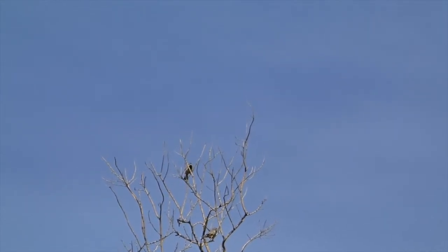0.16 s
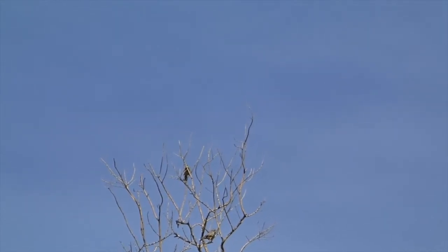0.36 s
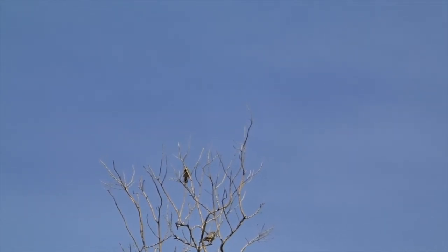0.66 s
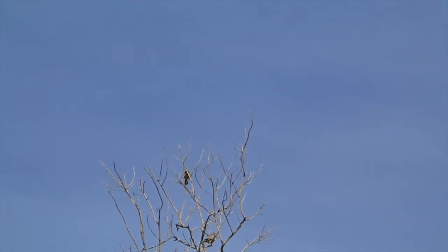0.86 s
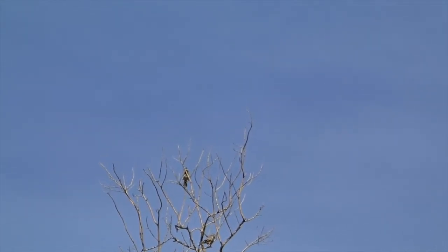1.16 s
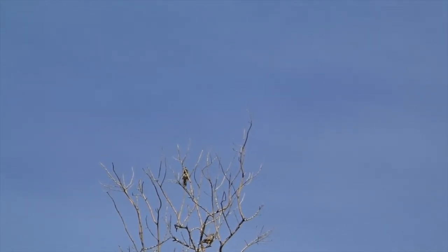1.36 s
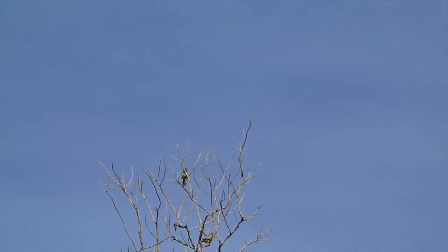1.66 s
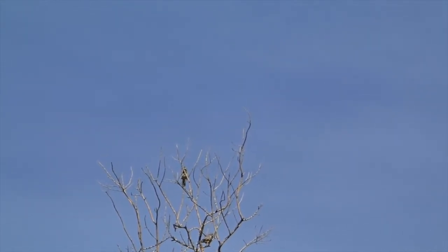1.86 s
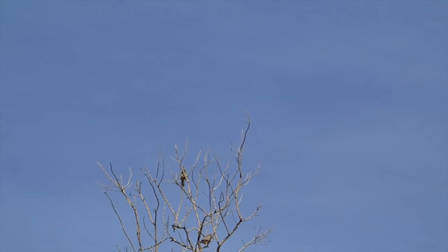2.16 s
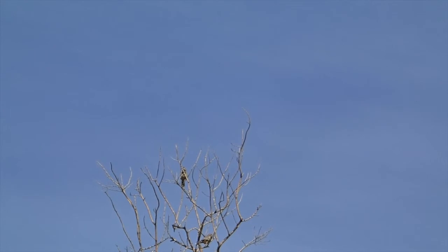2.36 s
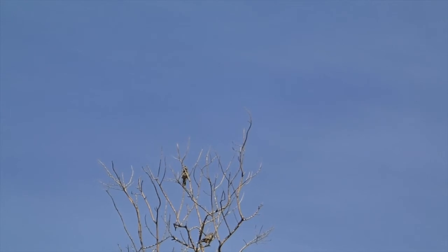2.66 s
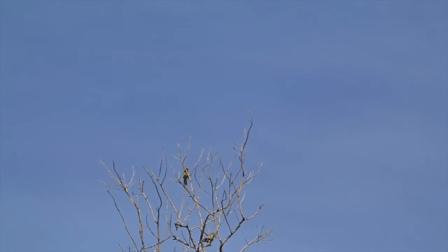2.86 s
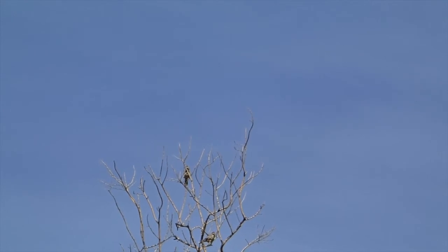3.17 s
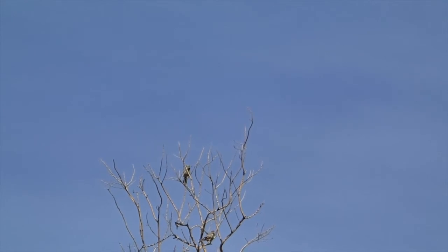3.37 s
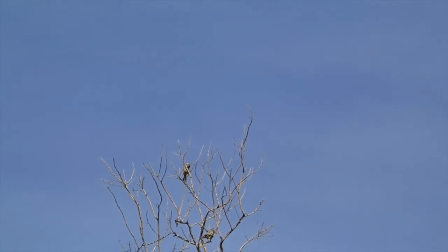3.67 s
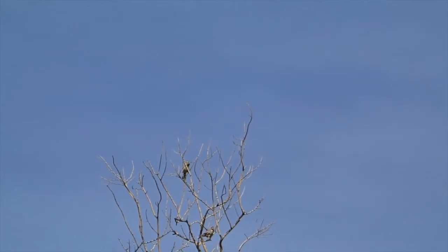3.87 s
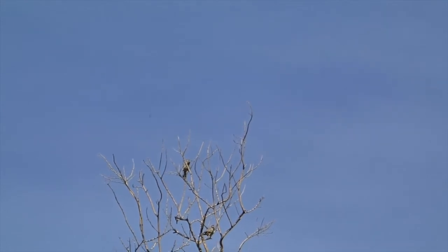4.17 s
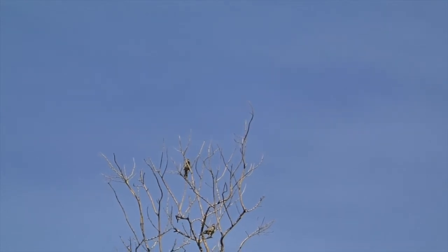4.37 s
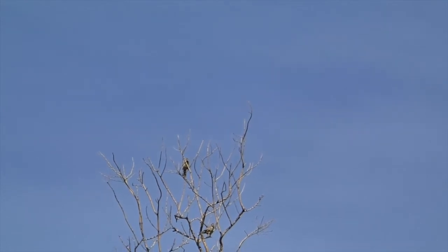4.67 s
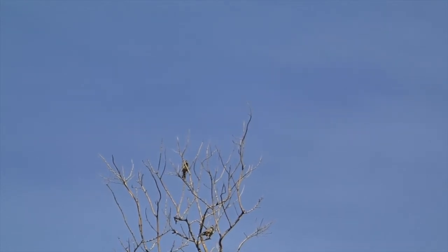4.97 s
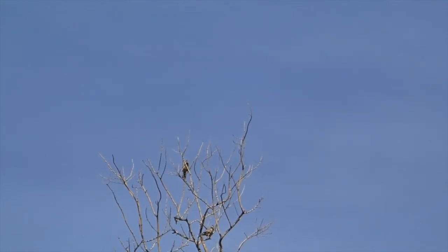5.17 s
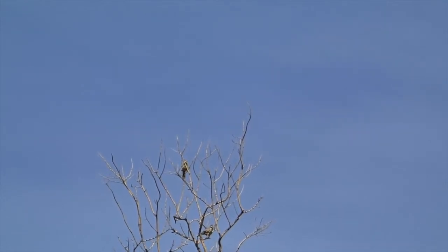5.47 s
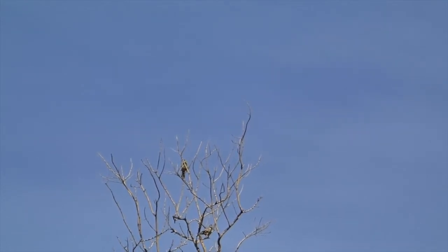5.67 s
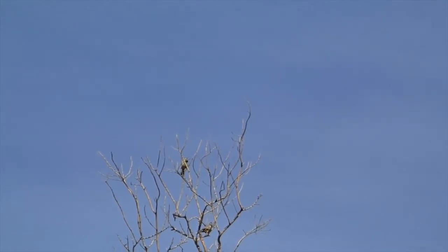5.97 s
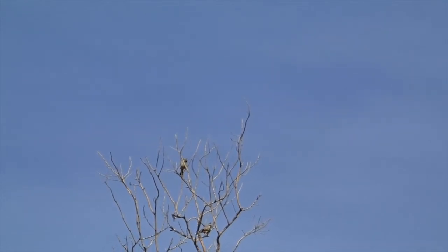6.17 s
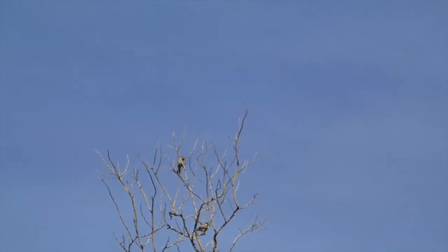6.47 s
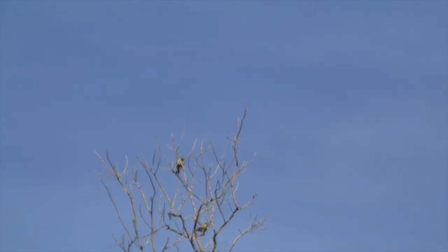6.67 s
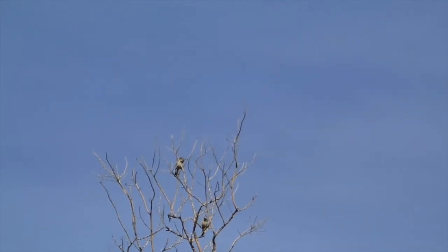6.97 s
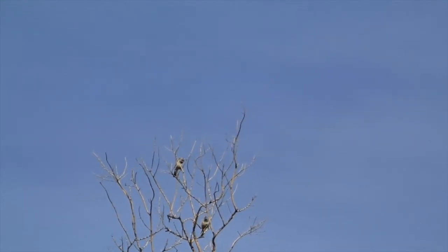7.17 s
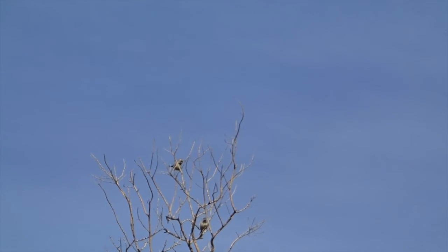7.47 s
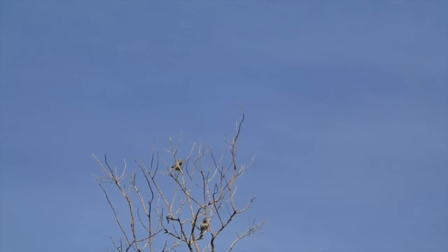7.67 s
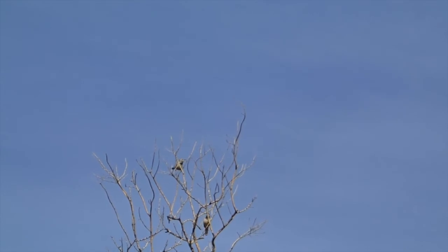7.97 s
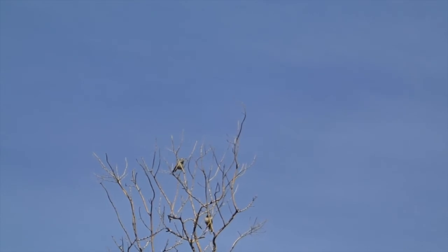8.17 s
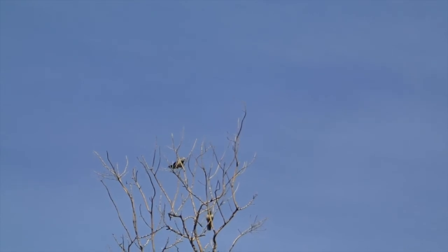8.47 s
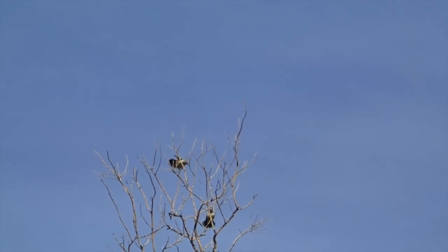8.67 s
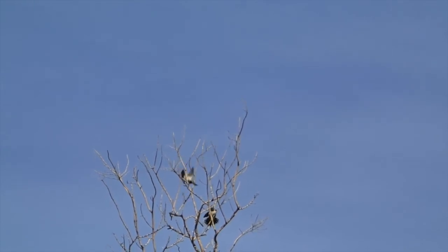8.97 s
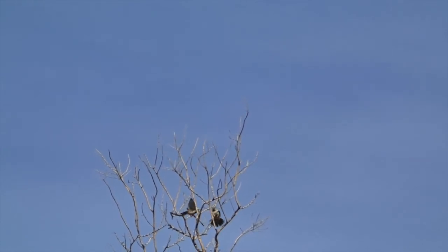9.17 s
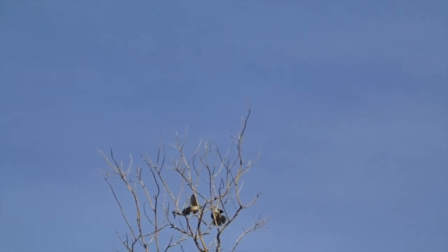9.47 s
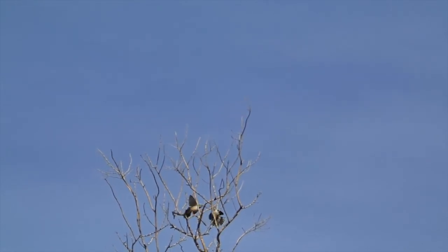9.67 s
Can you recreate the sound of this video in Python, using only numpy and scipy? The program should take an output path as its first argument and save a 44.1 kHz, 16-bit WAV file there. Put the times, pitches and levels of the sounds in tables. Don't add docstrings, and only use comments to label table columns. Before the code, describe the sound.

Outdoors under open sky, a wren gives steady hoarse chugs, about seven a second, swelling from faint to strong. Thin far chips and a faint distant chugging song follow. The near bird chugs again, then a dense overlapping rasping quarrel erupts with light wing rustles. Small stereo camera microphones add constant hiss, dry motor ticks mostly on the right and soft finger bumps.

```python
import sys
import numpy as np
from scipy import signal
from scipy.fft import rfft, irfft
from scipy.io import wavfile
from scipy.ndimage import uniform_filter1d

SR = 44100
rng = np.random.default_rng(int(sys.argv[2]) if len(sys.argv) > 2 else 0)


def master(y):
    cut = np.clip(np.atleast_2d(y).T, -1, 1)
    pcm = np.round(cut * 32767)
    wavfile.write(sys.argv[1], SR, pcm.astype(np.int16))


def ratio(d):
    e = np.asarray(d, float) / 20
    return 10 ** e


N = 433062

# f/Hz, density/dB
HISS_SPECTRUM = [(15, -75), (25, -45), (40, -40), (75, -5), (180, -2.5), (300, -2.5), (500, -2), (1400, -6),
                 (2500, -9.5), (3600, -14), (4700, -14), (5400, -10), (7000, -14.5), (15800, -16)]
# f/Hz, correlation/1
PORT_LIKENESS = [(30, .5), (80, 0.8), (150, 0.81), (300, 0.11), (900, 0.042), (15000, 0.029)]
# f/Hz, left minus right/dB
PORT_TILT = [(60, -5), (380, -4.5), (2380, -4.5), (15000, -3.5)]
# f/Hz, width/Hz, depth/dB
PORT_DIP = (4070, 230, -11)

# t/s, level/dB, f/Hz, t60/s, left minus right/dB
FINGER_BUMPS = [(2.027, -46, 128, 0.029, -21), (7.564, -41.5, 197, 0.037, -26),
                (7.574, -48, 120.2, 0.037, 20), (7.68, -50, 130, 0.025, -22),
                (7.6871, -30, 308, 0.014, -20), (7.696, -39.5, 170, 0.029, 22),
                (7.709, -43, 130, 0.049, -8), (7.725, -41, 190, 0.024, -17), (7.732, -44, 140, 0.044, 10),
                (7.79, -48.5, 81, 0.055, -9), (8.673, -45, 218, 0.051, -17), (8.69, -41, 110, 0.041, -6)]
# f/Hz, t60/s, left level/dB, right level/dB, share of the treble column/1
SHELL_MODES = [(820, 0.021, -46, -11.5, 0.05), (992, 0.043, -15, -27, 0.19), (1560, 0.017, -48, -14, 0),
               (1884, 0.0079, -2, -1, 0), (2665, 0.015, -13, 2, 0), (3010, 0.032, -25, -21, 0.43),
               (3740, 0.015, -34, -12, 0.45), (4745, 0.012, -21, 1, 0.67), (5500, 0.064, -38, -23, 0),
               (6520, 0.0092, -34, -13, 0.68), (7580, 0.0047, -30, -5.5, 0.15),
               (7840, 0.0023, -34, -1, 0.5), (9800, 0.0035, -38, -19.5, 1.15), (13800, .003, -45, -28, 1.2)]
# f/Hz, delay/ms, width/ms, left level/dB, right level/dB
GEAR_PING = (5260, 1.15, .58, -19, -2)
# first t/s, last t/s, level/dB, treble level/dB
MOTOR_RUNS = [(0.0489, .1164, -32, 5), (0.1828, .2493, -34, -8), (0.316, .5158, -34, 4),
              (0.583, .782, -31, 8), (0.849, .8492, -28.5, 7.5), (0.9164, 1.1153, -29.5, 7.5),
              (1.1826, 1.1826, -52, 13), (5.419, 5.42, -53, 17), (5.451, 5.4506, -30.5, 1),
              (5.557, 5.558, -34, -1), (5.623, 5.8895, -32, 4.5), (5.958, 6.0246, -37, 0.5),
              (6.09, 6.1563, -32, 6.5), (6.223, 6.2902, -34, 6.5), (6.358, 6.4227, -32.5, 6.5),
              (6.4637, 6.4642, -46, 25.5), (6.851, 6.8513, -58, 27), (6.8569, 6.8574, -24, 17),
              (6.8623, 6.8623, -56, 22), (6.8694, 6.8691, -50, 25), (6.8729, 6.8729, -25.5, 14.5),
              (6.878, 6.879, -42, -4), (7.055, 7.189, -32, 5), (7.258, 7.2577, -34, 1),
              (7.3222, 7.7226, -30, 9), (7.7899, 7.9229, -33, 5.5), (7.9902, 7.9902, -51, 13)]
DRIVE_SPANS = [
    (-1, 15),
    (165, 177),
    (179, 179),
    (181, 192),
    (208, 217),
    (232, 237),
]
REVERSED_FRAMES = [-1, *range(3, 16, 2), 165, 166, 169, 176, 186, 188, 191, 208, 209, 215, 217]
# f/Hz, left level/dB, right level/dB
DRIVE_WHINES = [
    (6180, -66, -56),
    (4811, -62, -47.5),
]
# t/s, length/s, f/Hz, left level/dB, right level/dB
SUSTAINED_WHINES = [
    (6.479, 0.13, 5740, -66, -48.5),
    (6.644, 0.199, 5764, -69, -48.5),
]

# t/s, length/s, middle f/Hz, end minus start/Hz, level/dB
ARCHED_CHIPS = [(1.232, 0.031, 4950, -500, -53), (1.302, 0.028, 4300, 596, -53),
                (2.827, 0.031, 4970, -100, -57), (2.833, 0.031, 5250, -300, -58),
                (3.152, 0.032, 5240, 10, -61), (3.193, .02, 6000, -700, -64), (3.321, 0.01, 4600, 600, -60),
                (3.397, 0.023, 4200, 900, -60), (4.524, 0.027, 5000, -50, -58.5),
                (4.593, .015, 4850, -50, -62), (4.648, 0.025, 5300, -600, -64)]
# t/s, length/s, middle f/Hz, end minus start/Hz, level/dB
STRAIGHT_CHIPS = [(2.724, .013, 4900, 1200, -59), (2.745, 0.02, 5400, -250, -63),
                  (2.76, 0.0125, 4760, -1000, -56), (2.875, .035, 5270, 50, -67),
                  (2.92, 0.027, 5300, 200, -68), (2.96, 0.011, 5500, 100, -67), (3.093, .02, 5500, 0, -66),
                  (3.196, .01, 5300, 100, -64), (3.226, .022, 5400, -400, -65),
                  (3.262, .01, 5600, 200, -65), (3.329, 0.023, 4720, -300, -57),
                  (4.222, 0.028, 4950, -1000, -62), (4.252, .032, 4580, 50, -64),
                  (4.283, 0.018, 4430, -300, -65), (4.287, .008, 5170, -800, -61),
                  (4.322, 0.02, 5200, -450, -65), (4.565, .02, 5700, 0, -67), (4.653, .014, 4720, 0, -65),
                  (4.68, .018, 4750, -100, -65)]
# t/s, length/s, level/dB
WING_BEATS = [
    (8.818, .04, -68),
    (8.946, 0.043, -58),
    (9.06, 0.043, -60),
    (9.116, 0.07, -55),
    (9.163, 0.045, -57),
    (9.25, .05, -61),
]
# f/Hz, level/dB
FEATHER_SPECTRUM = [(4500, -22), (6500, -2), (8000, -2), (10000, -2), (12500, 1), (15000, -20)]

# start t/s, end t/s, effort level/dB
RASP_TIMES = [(8.445, 8.705, -49.5), (8.452, 8.58, -53.5), (8.555, 8.69, -47.5), (8.712, 8.765, -47.5),
              (8.745, 8.815, -43.5), (8.795, 8.872, -39.5), (8.75, 8.88, -51.5), (8.738, 8.87, -53.5),
              (8.897, 8.96, -44.5), (8.915, 9.035, -39), (8.92, 8.995, -50.5), (8.975, 9.205, -44),
              (9.0, 9.09, -44), (9.06, 9.315, -43), (9.07, 9.305, -49), (9.055, 9.2, -47),
              (9.258, 9.445, -47), (9.315, 9.41, -43), (9.365, 9.47, -43.5), (9.34, 9.51, -43.5),
              (9.352, 9.51, -42.5), (9.49, 9.63, -42.5), (9.5, 9.63, -47), (9.515, 9.625, -41.5),
              (9.53, 9.672, -47.5), (9.46, 9.62, -44.5), (9.665, 9.903, -43.5), (9.685, 9.905, -41.5),
              (9.72, 9.83, -42), (9.67, 9.9, -48), (9.2, 9.32, -47), (9.6, 9.7, -49), (9.61, 9.69, -57),
              (9.29, 9.37, -51), (8.86, 8.93, -58), (8.68, 8.74, -54), (9.62, 9.71, -49)]
# start f/Hz, end f/Hz
RASP_GLIDES = [(2080, 1770), (2900, 2850), (2730, 2500), (2320, 2250), (1990, 2150), (2300, 1980),
               (1720, 1620), (3050, 2900), (1750, 1900), (2400, 1940), (3100, 3050), (2800, 2580),
               (1900, 1830), (2180, 2110), (3250, 3150), (1756, 1686), (1800, 1710), (2540, 2600),
               (2810, 2740), (2170, 2090), (3220, 2980), (3450, 3330), (2950, 3020), (2320, 2000),
               (1900, 1760), (2650, 2600), (3080, 3260), (2200, 2120), (2380, 1980), (2580, 2850),
               (2750, 2750), (2600, 2550), (3000, 2950), (2950, 2950), (2350, 2300), (1750, 1700),
               (2180, 2180)]
# f/Hz, level/dB
THROAT_FILTER = [(1200, -30), (1480, -5.5), (1620, 2.5), (3600, 3.5), (3900, 3)]
# f/Hz, level/dB
RASP_BREATH = [(600, -23), (850, -4), (1060, -5), (1300, 4.5), (1500, -13)]
# f/Hz, level/dB
RASP_TREBLE = [(2470, -36), (4250, -5), (4630, -2.5), (5660, 3), (6440, -10), (6750, -14), (7600, -35),
               (9880, -54), (16700, -120)]
# f/Hz, level/dB
RASP_HIGHEST = [(4470, -35), (7600, -28), (9460, -9), (10600, 5), (11800, 10), (12800, -8), (14500, -17)]
# t/s, gape level/dB
BEAK_GAPE = [(8.44, 1), (8.6, -5), (8.66, 6), (8.78, 4.5), (8.95, -2), (9.05, -1), (9.16, 0), (9.23, -2),
             (9.32, 1.5), (9.4, -0.5), (9.48, 1), (9.55, 6), (9.64, 0.5), (9.76, 5.5), (9.82, 4)]

# t/s, level/dB, f/Hz
CHUG_CONTOUR = [
    (-.025, -27, 880),
    (.001, -19, 960),
    (.008, -5.5, 1170),
    (.019, -4, 1250),
    (.04, -1.5, 1170),
    (.054, -0.5, 1060),
    (.068, 1, 1020),
    (.081, -3, 1005),
    (.094, -30, 980),
]
CHUG_HARMONICS = [-13.5, 0, -28, -25, -24]
# f/Hz, level/dB
CHUG_BREATH = [(700, -44), (1450, -19), (1700, 0), (2400, 0), (3200, -21), (4000, -72), (5000, -50)]
# f/Hz, level/dB
CHUG_TREBLE = [(3500, -22.5), (4500, -18), (5300, 1.5), (6200, -11), (7200, -21), (8300, -12), (9200, -9),
               (10600, -10), (11500, -30)]
# t/s, effort level/dB
NEAR_SONGS = [(0.34, -66), (0.497, -59), (0.639, -52.5), (.776, -49.5), (0.925, -49.5), (1.066, -44),
              (1.204, -40), (1.341, -38.5), (1.478, -37), (1.614, -36.5), (6.739, -62), (6.885, -52.5),
              (7.025, -49), (7.161, -44.5), (7.298, -42), (7.435, -41.5), (7.577, -43.5)]
# t/s, effort level/dB
FAR_SONG = [(3.783, -69), (3.941, -65), (4.08, -63.5), (4.222, -62), (4.372, -62.5), (4.508, -61),
            (4.651, -60), (4.793, -59), (4.94, -58.5), (5.082, -59), (5.234, -60), (5.36, -58),
            (5.528, -57.5), (5.659, -57.5), (5.802, -58.5), (5.961, -58.5), (6.103, -58.5), (6.251, -58),
            (6.402, -58.5)]
# t/s, effort level/dB
SOFT_FAR_CHUGS = [
    (1.751, -62),
    (1.875, -63.5),
]


def evened(x):
    return x / np.sqrt(np.mean(x ** 2) + 1e-20)


def read(points, hz):
    f, value = np.transpose(points)
    return np.interp(np.log(hz + 1), np.log(f + 1), value)


def add(mix, s, sound):
    at = round(s * SR)
    part = mix[..., max(at, 0):][..., :sound.shape[-1] + min(at, 0)]
    part += sound[..., max(-at, 0):][..., :part.shape[-1]]


def coloured(size, points):
    hz = np.fft.rfftfreq(size, 1 / SR)
    return evened(irfft(rfft(rng.standard_normal(size)) * ratio(read(points, hz)), size))


def drift(size, smooth):
    return evened(uniform_filter1d(rng.standard_normal(size), size=smooth))


def wobbly(hz, depth):
    return hz * (1 + depth * drift(len(hz), 200))


def whistle(hz):
    return np.sqrt(2) * np.sin(2 * np.pi * np.cumsum(hz) / SR)


def fuzz(hz, width_hz):
    low = signal.butter(4, width_hz / SR, output="sos")
    slow = signal.sosfilt(low, rng.standard_normal((len(hz), 2)) @ [1, 1j])
    return evened((slow * np.exp(2j * np.pi * np.cumsum(hz) / SR)).real)


def hiss():
    level_db, patch_db = -55, 0.84
    frames, hz = N // 256 + 5, np.fft.rfftfreq(1024, 1 / SR)
    a, b, c, d, patches = rng.standard_normal((frames, 513, 5)).T
    patches = uniform_filter1d(patches, size=12, axis=0)
    patches = evened(uniform_filter1d(patches, size=14, axis=1))
    same = np.clip(read(PORT_LIKENESS, hz), -1, 1)[:, None]
    tilt_db = read(PORT_TILT, hz)[:, None] / 2
    left = a + 1j * b
    right = same * left + np.sqrt(1 - same ** 2) * (c + 1j * d)
    spectra = np.array([left * ratio(tilt_db), right * ratio(-tilt_db)])
    spectra *= ratio(read(HISS_SPECTRUM, hz)[:, None] + patch_db * patches)
    sound = signal.istft(spectra, nperseg=1024, noverlap=768)[1][:, :N]
    return ratio(level_db) * sound / np.sqrt(np.mean(sound.mean(0) ** 2))


def bumps():
    out, t = np.zeros((2, N)), np.arange(4000) / SR
    for s, db, hz, t60, pan_db in FINGER_BUMPS:
        decay = ratio(db + 4.5 - 60 * t / t60)
        onset = 1 - np.exp(-(t * hz * 3.9) ** 2)
        push = decay * onset * np.cos(2 * np.pi * hz * t)
        add(out, s, ratio(np.array([[pan_db / 2], [-pan_db / 2]])) * push)
    return out


def motor_knock(db, treble_db):
    t = np.arange(2500) / SR
    push = 1 - np.exp(-(t / .0006) ** 2)
    knock = np.zeros((2, len(t)))
    for hz, t60, *port_db, share in SHELL_MODES:
        chance = rng.standard_normal()
        decay = ratio(db + share * treble_db + chance - 60 * t / t60)
        ring = decay * np.sin(2 * np.pi * hz * t + 0.43 * chance)
        knock += ratio(np.array(port_db))[:, None] * push * ring
    hz, delay_ms, width_ms, *port_db = GEAR_PING
    bell = np.exp(-((1000 * t - delay_ms) / width_ms) ** 2)
    ping = ratio(db + treble_db) * bell * np.sin(2 * np.pi * hz * t)
    return knock + ratio(np.array(port_db))[:, None] * push * ping


def drive_whine(length, hz, port_db):
    t = np.arange(round(length * SR)) / SR
    edge = np.clip(np.minimum(t, length - t) / 0.00036, 0, 1)
    sine = np.sin(2 * np.pi * (hz * t + rng.random()))
    return ratio(np.array(port_db))[:, None] * np.sqrt(2) * edge * sine


def motor():
    step_s, frame_s = 1 / 15, 1001 / 30000
    whine_start_s, whine_s = .0127, .025
    out = np.zeros((2, N))
    for first, last, db, treble_db in MOTOR_RUNS:
        for s in np.linspace(first, last, round((last - first) / step_s) + 1):
            add(out, s, motor_knock(db, treble_db))
    for first, last in DRIVE_SPANS:
        for frame in range(first, last + 1):
            hz, *port_db = DRIVE_WHINES[int(frame in REVERSED_FRAMES)]
            add(out, frame * frame_s + whine_start_s, drive_whine(whine_s, hz, port_db))
    for s, length, hz, *port_db in SUSTAINED_WHINES:
        add(out, s, drive_whine(length, hz, port_db))
    return out


def outdoors(x, t60=0.3):
    t = np.arange(SR // 4) / SR
    sparse = rng.random((3, len(t))) < .3
    taps = rng.standard_normal((3, len(t))) * sparse * ratio(-60 * t / t60) * (t > .003)
    taps = taps[0] + 0.29 * taps[1:]
    return signal.fftconvolve(x[None], taps / np.linalg.norm(taps[0]), axes=1)[:, :N]


def chip(length, middle_hz, slope_hz, db, arch=1):
    u = np.linspace(-1, 1, round(length * SR))
    arch_hz = arch * 578 * (length / 0.027) ** 3.9
    hz = middle_hz + slope_hz * u / 2 - arch_hz * abs(u) ** 2.3
    wobble_db = 0.5 * drift(len(u), 120)
    edge = signal.windows.tukey(len(u), .3)
    return ratio(db + wobble_db) * whistle(wobbly(hz, .012)) * edge


def wing(length, db):
    size = round(length * SR)
    return ratio(db) * np.hanning(size) * coloured(size, FEATHER_SPECTRUM)


def pulses(rate, buzz, jitter, uneven_db, skew):
    unsteady_rate = rate * (1 + jitter * drift(len(rate), 250))
    turns = np.cumsum(unsteady_rate) / SR + rng.random()
    number = turns.astype(int)
    shape = np.sin(np.pi * (turns % 1) ** skew) ** (.7 + 1.5 * buzz)
    strength = ratio(uneven_db * np.clip(rng.standard_normal(999), -2, 2))
    return number, evened(shape * strength[number])


def tone(hz, number, slip):
    phase = np.cumsum(slip * rng.standard_normal(999))[number]
    return np.sqrt(2) * np.sin(2 * np.pi * np.cumsum(hz) / SR + phase)


def rasp(start, end, effort_db, start_hz, end_hz):
    attack_s, release_s, pulses_per_s, sweep_hz = 0.027, 0.064, 156, 75
    t = np.arange(0, end - start, 1 / SR)
    size, u = len(t), t / t[-1]
    rise, fall = np.clip(1 - t / attack_s, 0, 1), np.clip(1 - t[::-1] / release_s, 0, 1)
    level_db = effort_db + 2 * (u - .6) - 8.5 * (rise ** 2 + fall ** 2)
    level_db = level_db + 1.4 * drift(size, 900)
    slide = start_hz + (end_hz - start_hz) * (1 - np.cos(np.pi * u)) / 2
    hz = wobbly(slide * (1 - .04 * rise ** 2), .009)

    air_db = 5 * (start_hz - 2800) / 1000 + 0.095 * (effort_db + 38.0)
    air_db = air_db + 2 * drift(size, 1600)
    gape_db = np.interp(start + t, *np.transpose(BEAK_GAPE))

    number, puff = pulses(pulses_per_s * slide / slide.mean(), .4, jitter=.05, uneven_db=.8, skew=.67)
    bend = evened(uniform_filter1d(np.gradient(puff), size=60))
    hz = hz + sweep_hz * bend
    gate = .4 + .68 * puff
    snaps = tone(.88 * hz, number, slip=.55) + ratio(-3) * tone(1.1 * hz, number, slip=.55)
    rough = ratio(-3.5) * puff * snaps + ratio(3) * gate * fuzz(slide, width_hz=800)
    body = gate * tone(hz, number, slip=.4) + ratio(-6) * rough
    throat = ratio(read(THROAT_FILTER, np.fft.rfftfreq(size, 1 / SR)))
    body = irfft(rfft(body) * throat, size)

    air = ratio(-16.5) * coloured(size, RASP_BREATH)
    if start_hz < 2500:
        under_hz = wobbly(1065 + .6 * (slide / 2 - 1065), .025)
        air += ratio(-14.5) * tone(under_hz, number, slip=.52)
        air += ratio(-22.5) * tone(under_hz - 175, number, slip=.47)
    treble = coloured(size, RASP_TREBLE) + ratio(-14.5) * fuzz(2 * slide, width_hz=320)
    air += ratio(-10 + air_db + gape_db) * treble
    shriller_db = 4 * (start - 11.5)
    air += ratio(-13 + air_db + 1.6 * gape_db + shriller_db) * coloured(size, RASP_HIGHEST)
    return ratio(level_db - 3.5) * (body + gate * air)


def chug(effort_db, dull_db=0, slack=1):
    sag = slack * .25 * (max(-39.5 - effort_db, 0) / 30) ** 1.4
    pitch, bright_db = 1 - sag, 1.5 + 32 * sag + dull_db
    s, *columns = np.transpose(CHUG_CONTOUR)
    t = np.arange(s[0], s[-1], 1 / SR)
    since_onset = np.maximum(t, 0)
    level_db, hz = (np.interp(t, s, column) for column in columns)
    hz = wobbly(hz, .011)
    hoarse = 1 / (1 + np.exp((0.048 - t) / 0.0048))
    noise_db, second_db = -12 + 7 * hoarse, -17.5 + 9.5 * hoarse
    number, puff = pulses(160 * (1 + .5 * hoarse), .2, jitter=.1, uneven_db=.7, skew=1.5)
    hz = hz - 22 * evened(puff - puff.mean())

    voice = np.zeros(len(t))
    for k, db in enumerate(CHUG_HARMONICS):
        harmonic_hz = (k + 1) * hz * pitch ** min(k + .35, 1)
        if k == 0:
            harmonic_hz = harmonic_hz * (1 + .12 * np.exp(-since_onset / .022))
            db = db + 2.5 - 9 * 4 * hoarse * (1 - hoarse)
        if k > 1:
            db = db + bright_db
        voice += ratio(db) * tone(harmonic_hz, number, slip=.85 - .1 * k)

    second_hz = 1627 + 303.5 * np.exp(-np.maximum(t - .036, 0) / .012)
    voice += ratio(second_db) * tone(second_hz * pitch ** .5, number, slip=.5)
    smear_db = -11 + 38 * sag
    voice += ratio(smear_db) * fuzz(2 * hz * pitch, width_hz=450)
    top = [(f, db + (f > 7000) * 2.4 * (effort_db + 39.5)) for f, db in CHUG_TREBLE]
    voice += ratio(-20 + 4 * hoarse + bright_db) * coloured(len(t), top)
    strand_hz = 5200 + 1.5 * (hz - 1020) * hoarse
    voice += ratio(-21 + bright_db) * fuzz(strand_hz, width_hz=350)
    colour = [(f * pitch ** (f < 3500), db + (f > 2800) * bright_db) for f, db in CHUG_BREATH]
    breath = ratio(noise_db) * coloured(len(t), colour)

    late = np.clip(.25 * sag * .1 - t, 0, .02) / .02
    level_db = level_db - 30 * late * min(10 * sag, 1)
    flow = .4 + .4 * hoarse + (.66 - .42 * hoarse) * puff
    return ratio(effort_db + level_db * pitch ** 2) * flow * (voice + breath)


def scene():
    birds, far = np.zeros((2, N))
    for s, *note in ARCHED_CHIPS:
        add(birds, s, chip(*note))
    for s, *note in STRAIGHT_CHIPS:
        add(birds, s, chip(*note, arch=0))
    for s, *beat in WING_BEATS:
        add(birds, s, wing(*beat))
    for row, glide in zip(RASP_TIMES, RASP_GLIDES):
        add(birds, row[0], rasp(*row, *glide))
    songs = ((birds, NEAR_SONGS, 0, 1),
             (far, FAR_SONG, -8, .98),
             (far, SOFT_FAR_CHUGS, 0, .15))
    for mix, notes, dull_db, slack in songs:
        for s, effort_db in notes:
            add(mix, s + CHUG_CONTOUR[0][0], chug(effort_db, dull_db, slack))
    birds = birds + far + outdoors(ratio(-15) * birds + ratio(-8) * far)
    return hiss() + bumps() + motor() + birds * ratio(np.array([[-2.2], [1.8]]))


def top_cut(x):
    return signal.sosfilt(signal.butter(12, 16450, fs=SR, output="sos"), x)


def record(dry):
    hz = np.fft.rfftfreq(N, 1 / SR)
    centre_hz, width_hz, depth_db = PORT_DIP
    dip_db = depth_db * np.exp(-((hz - centre_hz) / width_hz) ** 2)
    bass_cut = 1 / (1 + (45 / (hz + 1)) ** 4)
    ported = irfft(rfft(dry) * ratio(dip_db) * (hz < 15830) * bass_cut, N)
    return top_cut(ported)


dry = scene()
out = record(dry)
master(out)
```